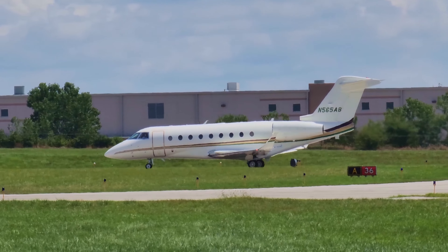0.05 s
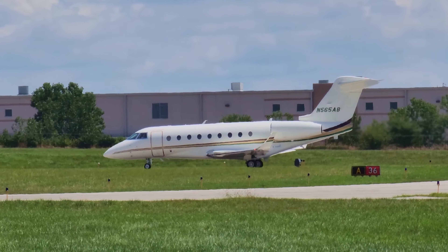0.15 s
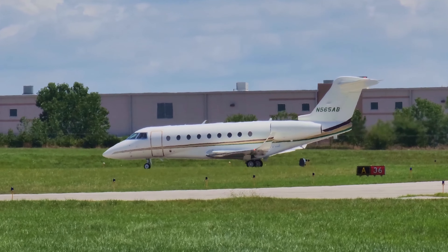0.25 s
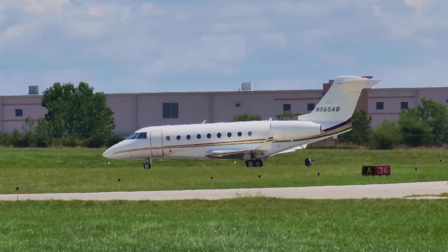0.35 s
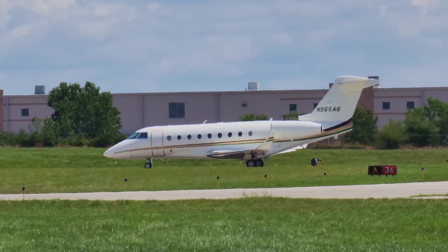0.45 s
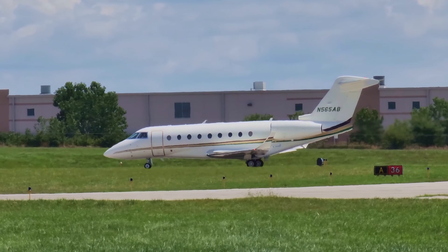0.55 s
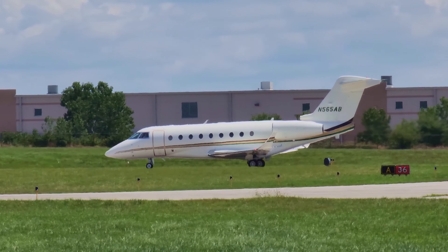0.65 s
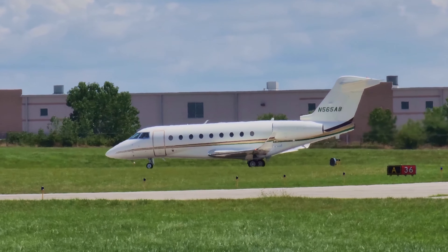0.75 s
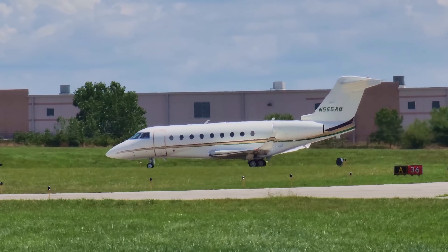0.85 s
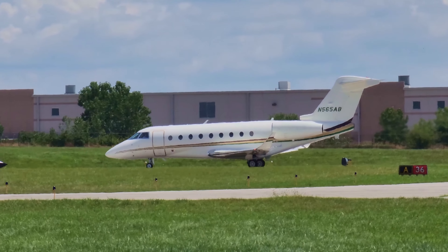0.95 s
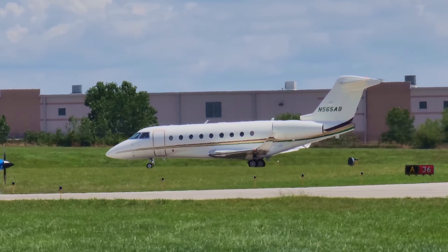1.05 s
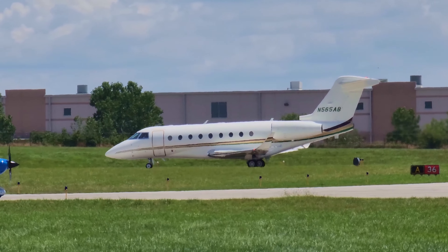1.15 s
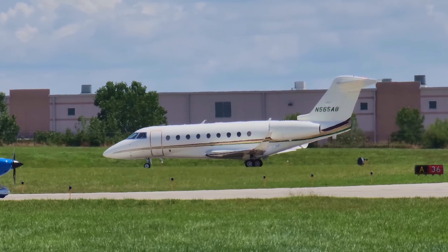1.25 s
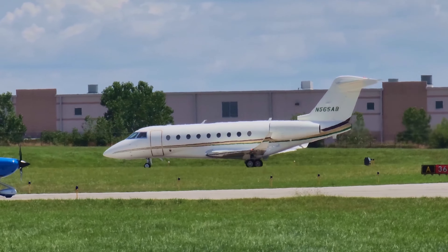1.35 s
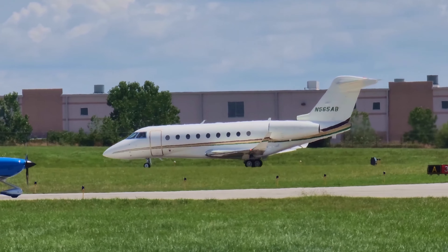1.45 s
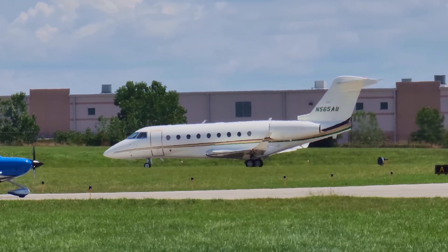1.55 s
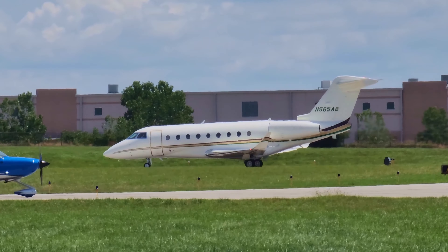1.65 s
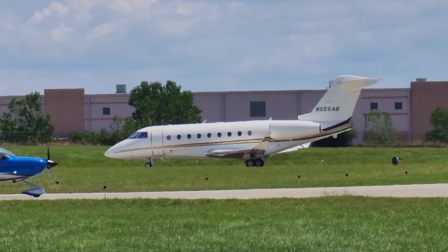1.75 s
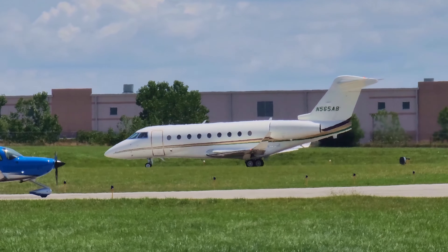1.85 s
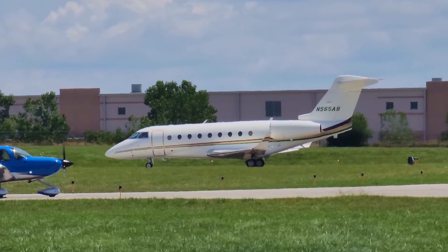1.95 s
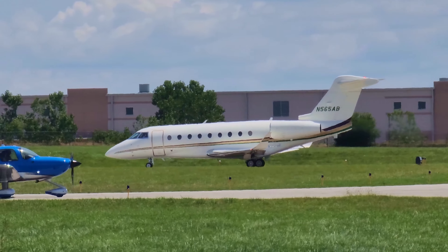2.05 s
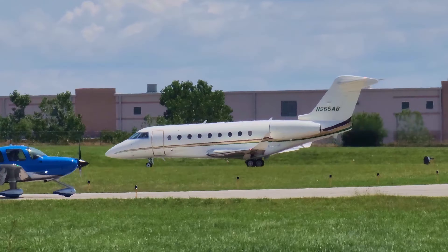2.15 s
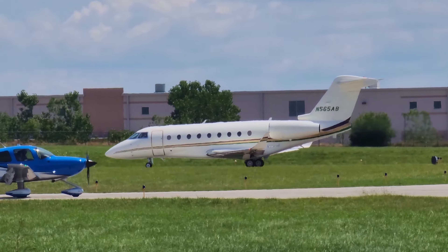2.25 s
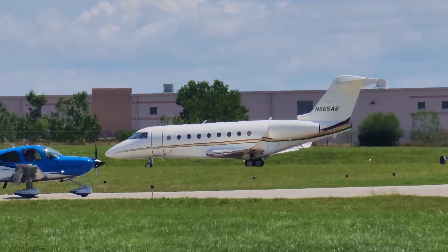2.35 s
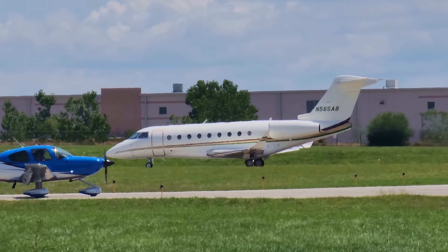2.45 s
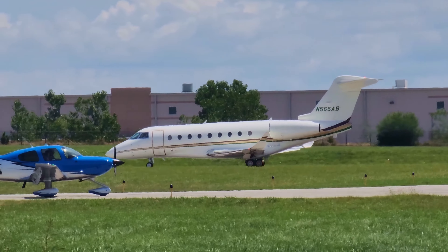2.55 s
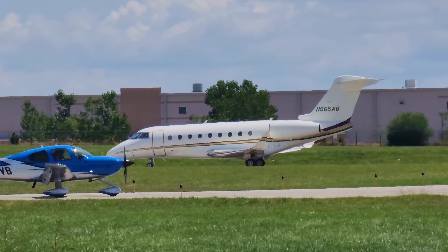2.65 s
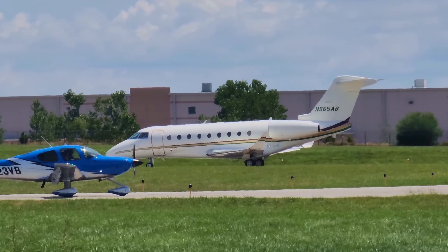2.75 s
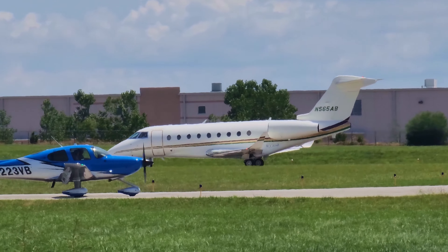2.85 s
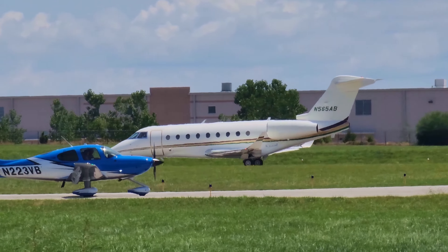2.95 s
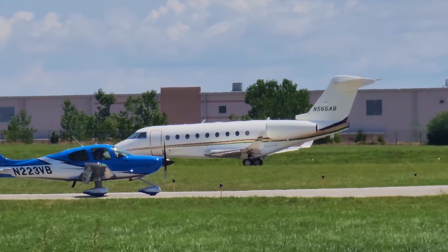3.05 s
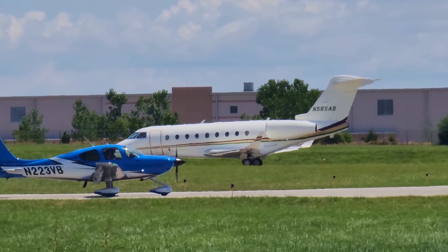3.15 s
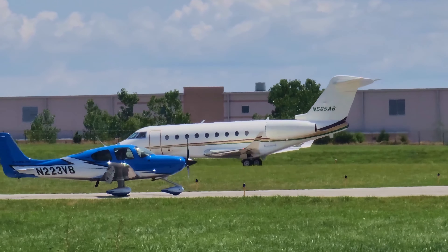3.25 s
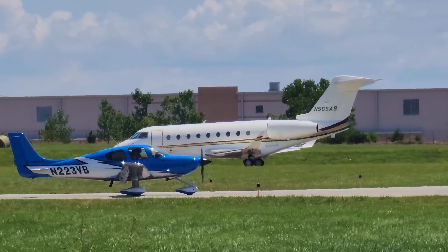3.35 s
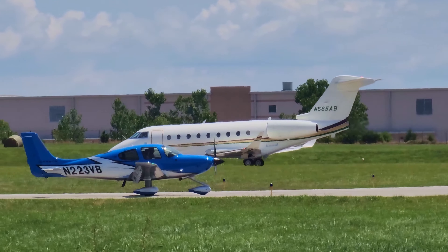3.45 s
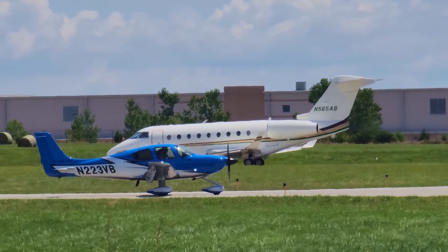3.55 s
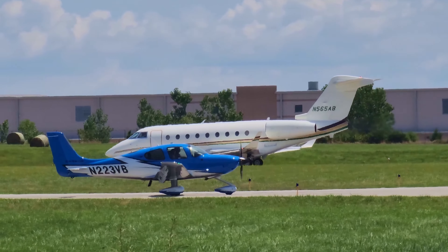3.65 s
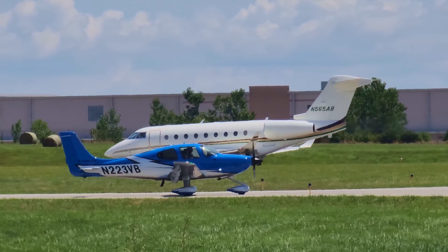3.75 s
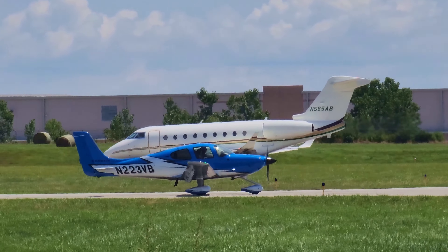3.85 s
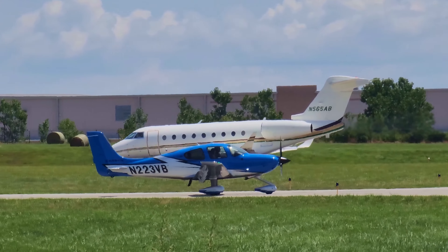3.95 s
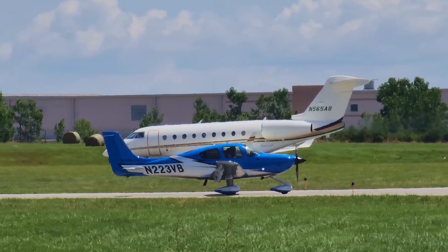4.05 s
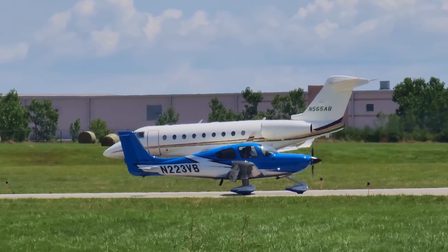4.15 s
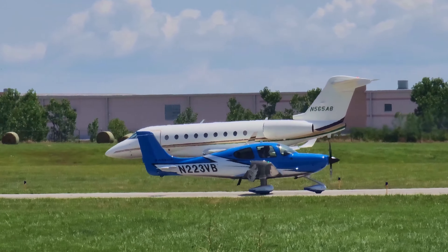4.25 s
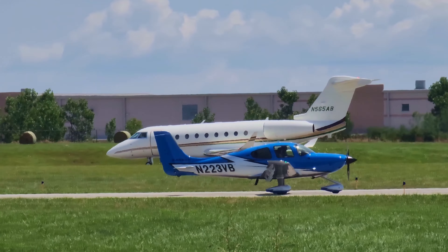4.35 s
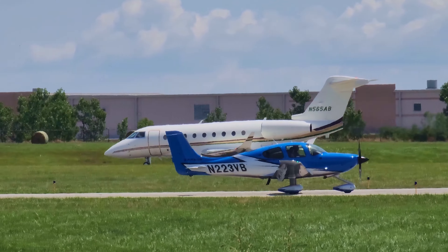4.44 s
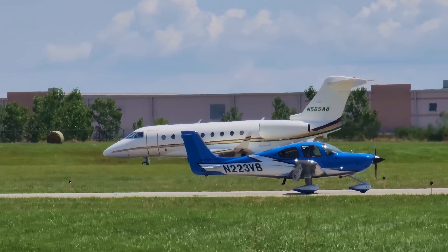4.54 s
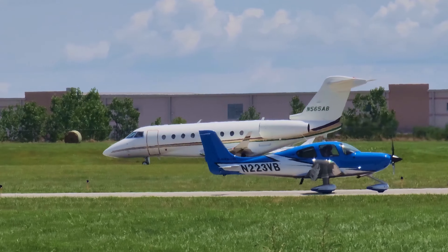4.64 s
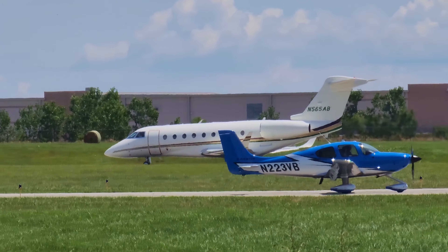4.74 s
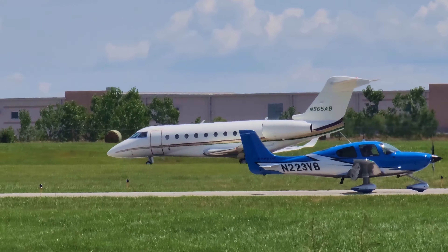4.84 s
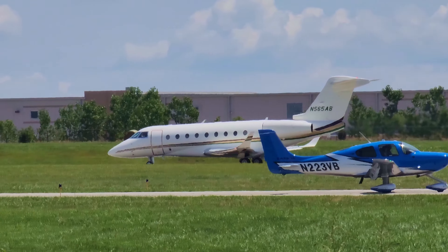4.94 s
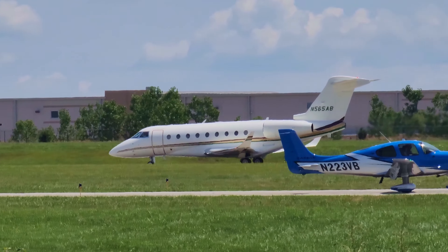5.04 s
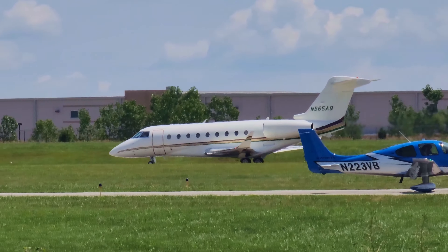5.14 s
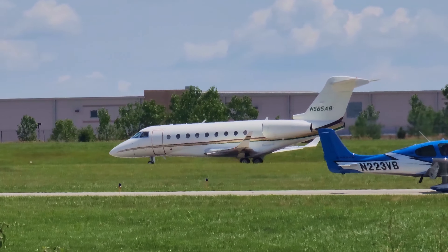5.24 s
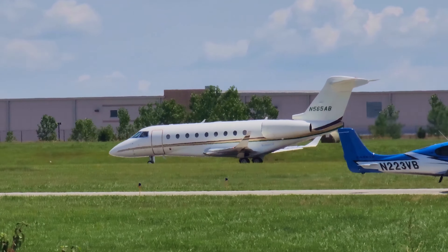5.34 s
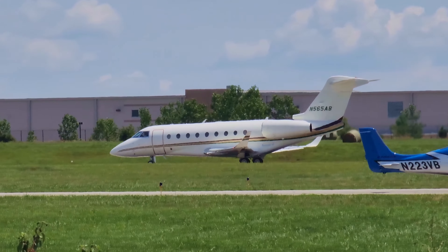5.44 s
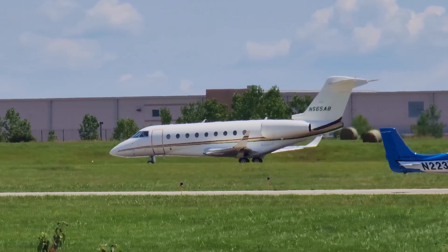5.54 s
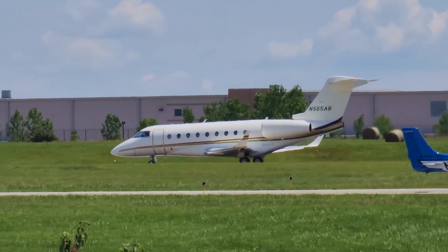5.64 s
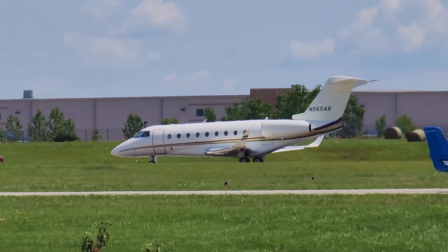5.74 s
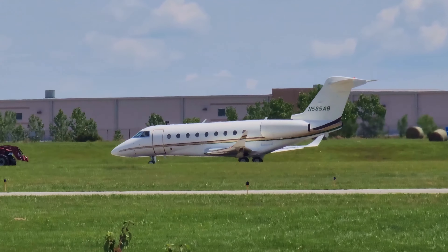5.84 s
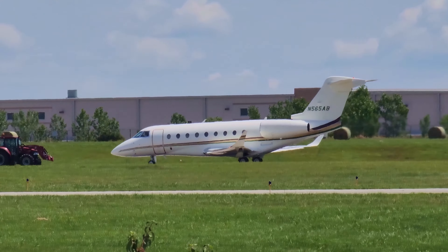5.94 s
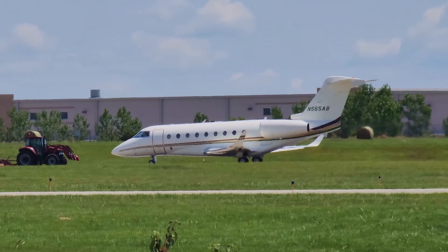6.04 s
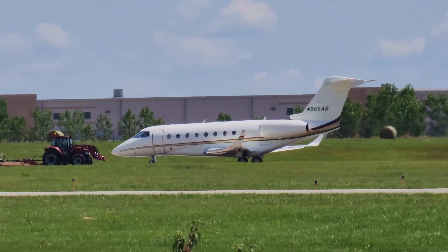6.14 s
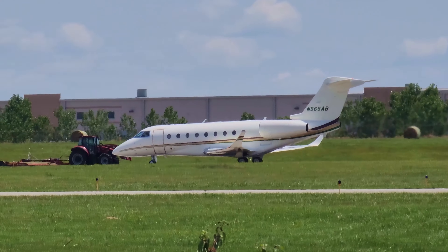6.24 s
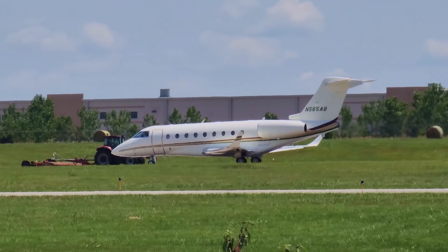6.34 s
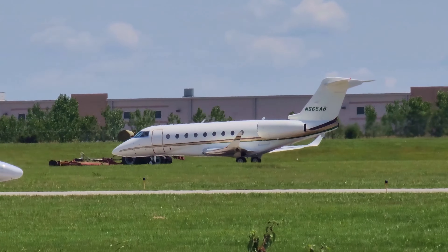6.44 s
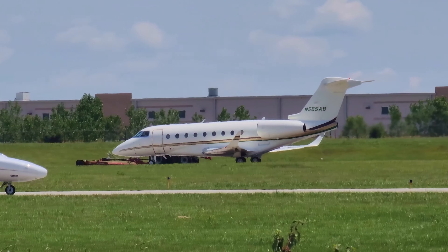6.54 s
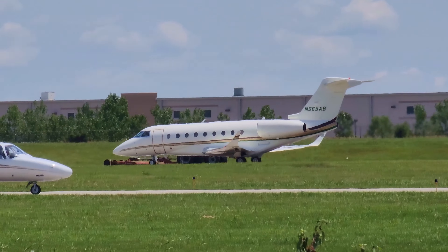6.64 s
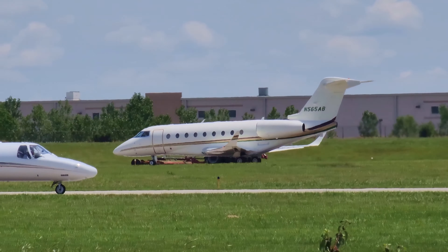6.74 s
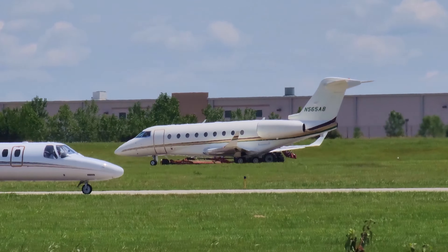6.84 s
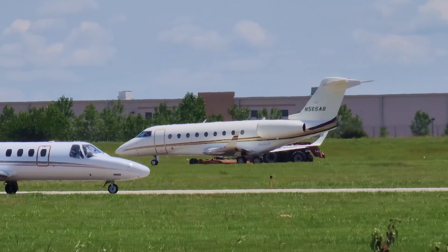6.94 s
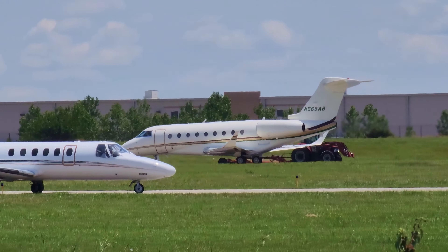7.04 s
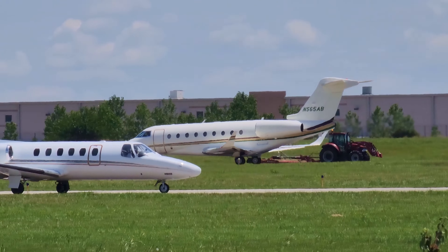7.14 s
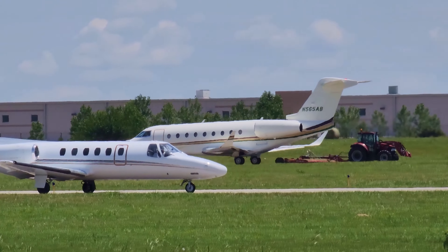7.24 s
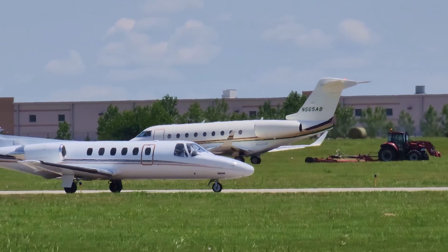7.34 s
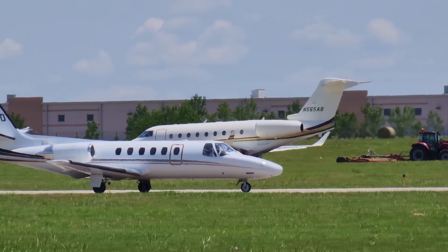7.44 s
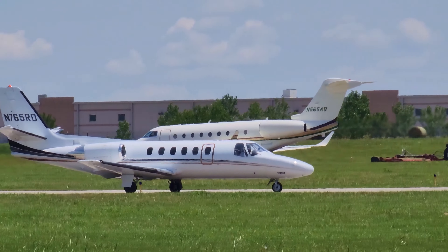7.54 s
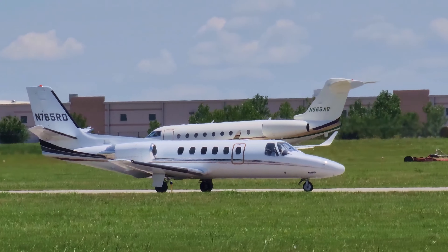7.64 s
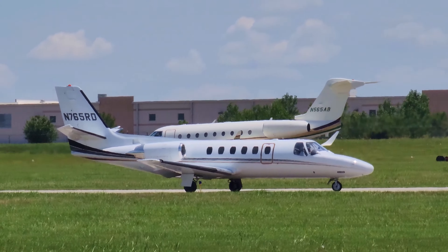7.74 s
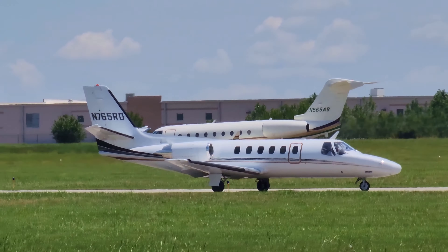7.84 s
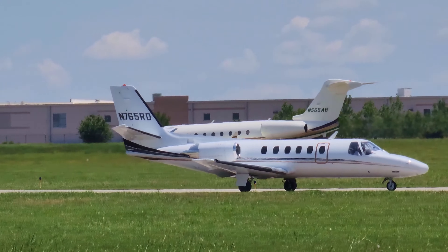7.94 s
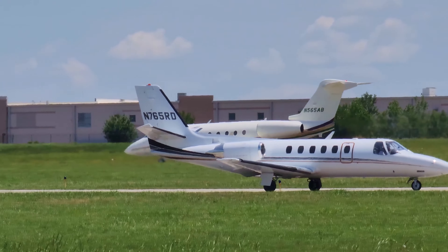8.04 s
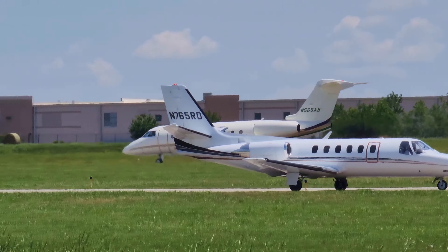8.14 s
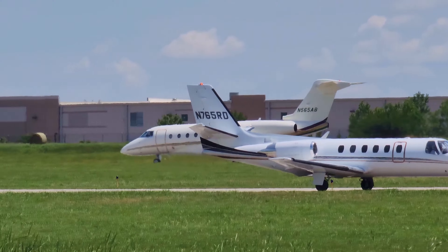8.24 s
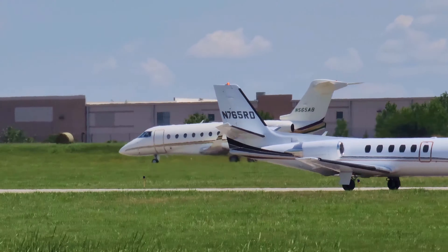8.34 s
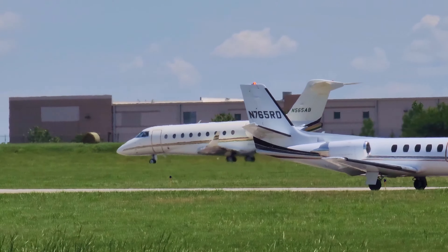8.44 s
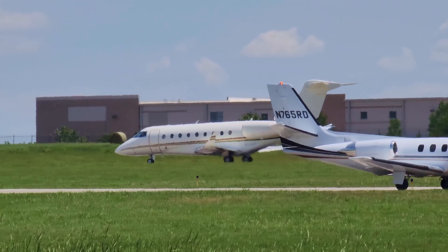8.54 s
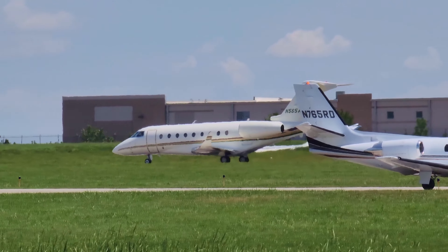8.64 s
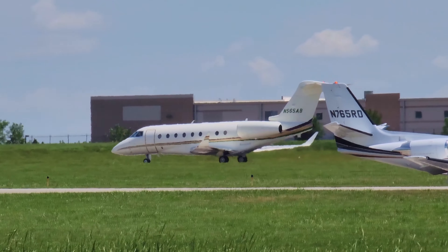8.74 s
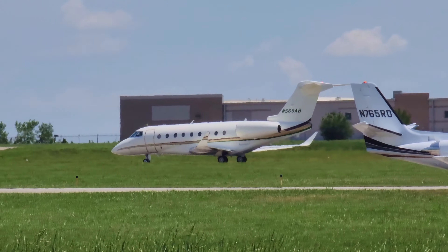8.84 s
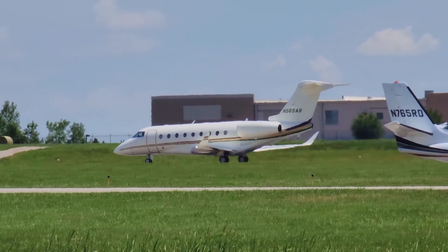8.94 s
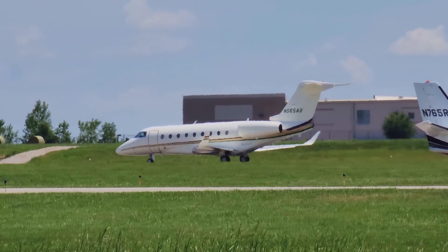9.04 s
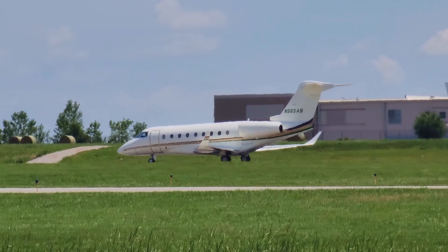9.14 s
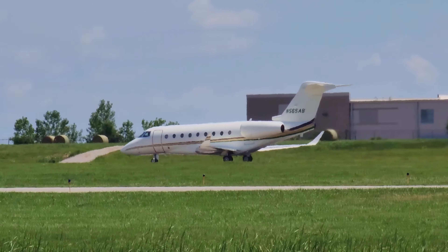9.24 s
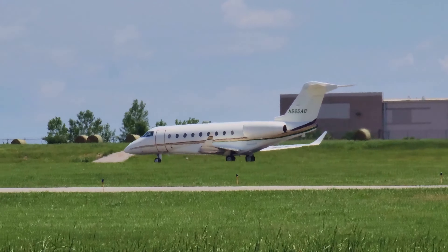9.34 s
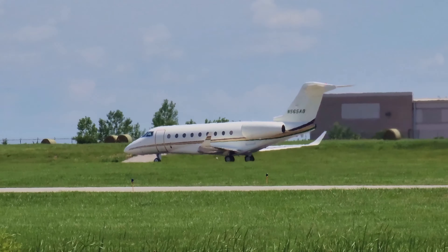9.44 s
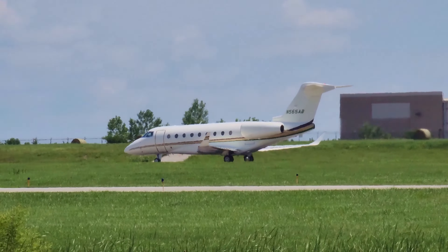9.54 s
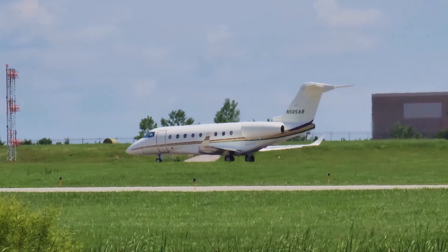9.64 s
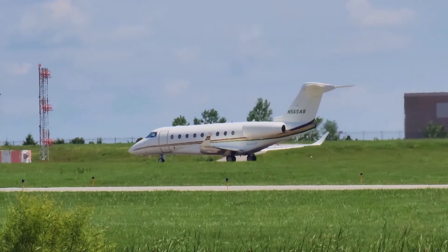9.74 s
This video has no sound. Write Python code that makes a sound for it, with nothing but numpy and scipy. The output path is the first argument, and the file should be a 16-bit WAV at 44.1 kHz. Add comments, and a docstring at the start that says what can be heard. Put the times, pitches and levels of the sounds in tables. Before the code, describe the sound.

A twin-engine business jet takes off across an open airfield, captured by a distant stereo outdoor microphone. From 0 to 2 s it idles up: uneven low rumble, airy hiss, and smeared compressor whines gliding from about 3 to nearly 5 kHz, swelling and fading. Another idling turbine adds steady thin tones and soft airflow slightly left; a fluttering whistle appears near 1.4 s, a higher falling one from 2.1 to 2.7 s. Power surges from 2.6 s; intake hiss crests around 3.3 s and a piercing fan whine near 3 kHz peaks at 3.5 s. By 4 s the deep exhaust roar buries almost everything, with a brief falling hum near 4.7 s. From 6 s the roar turns rougher and brighter, swaying with faint hollow coloration, still at full strength when it cuts off at 9.8 s. Low breeze puffs nudge the microphone, strongest around 9.6 s, and limiting flattens the loudest swells.

```python
"""Business jet taking off across an airfield

A jet across the field spools up from idle to takeoff power and starts its roll, heard on two ports.
Compressor and fan whines climb as smeared tones in a band of intake hiss, then drown in the exhaust:
filtered noise for a deep rumble and a roar, coloured by peaks and notches of the path over the ground.
An idling turbine's tones and airflow reach the left port first, thin whistles and hums come and go,
breeze stirs on the microphone, and the recorder's limiter holds the loudest swells."""
import sys
import numpy as np
from scipy import signal
from scipy.fft import rfft, irfft, next_fast_len
from scipy.io import wavfile
from scipy.ndimage import uniform_filter1d, minimum_filter1d, map_coordinates

SR = 44100
rng = np.random.default_rng(int(sys.argv[2]) if len(sys.argv) > 2 else 0)


def generate_wav(signal):
    """Clip the signal to [-1, 1] and save it as 16-bit WAV at the path in sys.argv[1]."""
    frames = np.transpose(np.atleast_2d(signal))
    scaled = np.clip(frames, -1, 1) * 32767
    pcm = np.round(scaled).astype(np.int16)
    wavfile.write(sys.argv[1], SR, pcm)


N = 431732

# engine power from idle to takeoff: (time [s], level relative to full power [dB])
POWER = [(0, -16), (.8, -16), (1.8, -12.5), (2.6, -10), (3.1, -4), (3.6, -1), (4.2, 0.25), (9.79, 0.62)]
# blade-passing pitch of the compressor's first stage: (time [s], pitch [Hz])
CORE = [(0, 2990), (.25, 3130), (.48, 3310), (1.03, 3741), (1.6, 4170), (1.82, 4480), (2.08, 4900),
        (2.6, 5930), (3.25, 7320), (4, 8300), (5.7, 8540), (7.2, 8510), (8.4, 8330), (9.79, 8290)]
# intake sound cresting during spool-up, reference for its noise and lines: (time [s], level [dB])
INTAKE = [(0, -53.5), (.6, -56), (1, -46), (1.7, -50), (2.1, -45.5), (2.5, -45), (2.95, -40), (3.3, -38.5),
          (3.6, -45.5), (4, -50.5), (4.7, -51.5), (9.79, -56)]
# centre of the intake hiss: base [Hz] plus slope [Hz per Hz of compressor pitch]
HUMP_BASE_HZ, HUMP_SLOPE = 2494, 0.64


def exhaust():
    """Large eddies rumble and small ones roar and hiss; all grow with engine power."""
    # noise spectra of the six bands: (frequency [Hz], density [dB per Hz])
    deep_spectrum = [(18, -38), (30, -15), (48, -6.5), (68, 0.5), (105, 0.5), (125, -5), (150, -8.5),
                     (220, -48.5), (500, -100)]
    rumble_spectrum = [(60, -38.5), (105, -7), (128, 1.5), (170, 0), (235, -11.5), (280, -22), (340, -44.5),
                       (460, -58), (1000, -110)]
    edge_spectrum = [(180, -27), (250, 4), (285, -1.5), (330, -4.5), (400, -11), (500, -23.5), (1000, -100)]
    low_spectrum = [(180, -42.5), (300, -10.5), (400, 2.5), (500, 1), (640, 4.5), (800, 7), (1000, -20.5),
                    (1400, -45.5), (3000, -100)]
    roar_spectrum = [(500, -51), (800, -11), (1000, -3), (1400, 4), (2200, -1.5), (2700, -2), (3200, -5.5),
                     (4000, -11), (5500, -30), (9000, -94)]
    hiss_spectrum = [(2000, -38.5), (3300, -16), (4000, 3.5), (4700, 7), (5500, 7.5), (6500, 2), (6900, -3),
                     (7500, -0.5), (8050, -5), (8500, -5), (11000, 1)]
    # band: (level at full power [dB], slope with power [dB per dB], slope with aim [dB per dB])
    bands = {"deep": (-8.5, 1, 0), "rumble": (-11.5, 1.1, 0), "edge": (-34, 0.95, 0),
             "low": (-38, 1.52, 0.84), "roar": (-27.5, 1.43, 0.91), "hiss": (-37.5, 0.73, 0.53)}
    # the rolling jet turns its exhaust toward the listener: (time [s], gain [dB])
    aim_points = [(4.6, 0.5), (5, -1.7), (5.6, 0), (6, 3.5), (6.5, 2.5), (7.3, 3.5), (8, 5), (8.9, 4.5),
                  (9.15, 5), (9.4, 6), (9.79, 4.5)]
    # brightness of the rumble: (time [s], gain of the rumble [dB], gain of its top edge [dB])
    brightness = [(0, -2, 1.5), (.3, 2, -1.5), (.4, 6, 9.5), (.52, 2, 0), (1.5, 0, 1.5), (3.3, 0.5, -2.5),
                  (4.5, 1, 2.5), (5.4, -5.5, -7), (6.1, -6, 0), (6.7, -2, 5), (7.7, 0.5, 5.5),
                  (8.4, 1.5, 3), (9.5, -2.5, -3)]
    # slow sway: (time [s], gain of the low roar [dB], gain of the hiss [dB])
    sway = [(2, -1.5, -1), (2.8, 2.5, 0.5), (3.9, -2, -2), (4.5, -1.5, 1.3), (5.1, 0.5, -2.7),
            (5.55, 2.5, -0.5), (5.95, -3.5, -0.5), (6.25, 1, 1.5), (6.55, -3, -0.5), (7.1, 0.5, 2),
            (7.45, -0.5, -0.5), (7.7, -1.5, -.5), (8.05, -2.5, -0.5), (8.4, 3, 0.5), (8.85, -1, 0.5),
            (9.35, 2.5, 2.5), (9.6, 0.5, -4.5), (9.79, 5.5, 0.5)]
    # the two deepest bands dip briefly: (time [s], length [s], depth [dB])
    lulls = [(0, 0.15, 8.5), (0.615, 0.29, 12), (1.277, .1, 4), (2.614, 0.36, 3)]
    # the two deepest bands wander between the ears at first: (time [s], left minus right [dB])
    wander_points = [(0, -5), (.75, -1.5), (1.25, -4.5), (1.7, 1.5), (2.25, 0.5), (2.7, -6), (3.1, 0)]

    power, = curves(POWER)
    aim, = curves(aim_points)
    rumble_db, edge_db = curves(brightness)
    low_db, hiss_db = curves(sway)
    level = {band: db + by_power * power + by_aim * aim
             for band, (db, by_power, by_aim) in bands.items()}

    deep = amp(level["deep"] + 0.99 * wobble(12)) * turbulence(deep_spectrum, patchy_db=0.33)
    rumble_level = level["rumble"] + rumble_db + 0.6 * wobble(9)
    rumble = amp(rumble_level) * turbulence(rumble_spectrum, patchy_db=0.82)
    edge = amp(level["edge"] + edge_db + 1.3 * wobble(8)) * turbulence(edge_spectrum, patchy_db=2.0)
    low = amp(level["low"] + low_db + 1.4 * wobble(10)) * turbulence(low_spectrum, patchy_db=1.5)
    flutter = wobble(22)  # roar and hiss flutter together
    roar = amp(level["roar"] + 0.25 * flutter) * turbulence(roar_spectrum, patchy_db=1.1)
    hiss = amp(level["hiss"] + hiss_db + 0.26 * flutter) * turbulence(hiss_spectrum, patchy_db=1.5)

    lull = amp(-sum(db * swell(s, length) for s, length, db in lulls))
    wander = amp(np.outer([0.5, -0.5], curves(wander_points)[0]))
    upper = placed(over_ground(low + roar + hiss), lead_ms=-0.026, pan_db=-1.0)
    return lull * wander * (deep + rumble) + edge + upper


def over_ground(pair):
    """Sliding path peaks and notches, a wall's echo combing the sound, and a quick grain from moving air."""
    # how the peaks and notches move: (time [s], shift [Hz], depth [factor])
    path_drift = [(0, -2, 1.1), (3.7, -8, 0.82), (4.6, -2.5, 1), (6.2, 11, 0.85), (7.4, 14, 0.93),
                  (8.4, -7.5, 0.79), (8.9, 5, 0.85), (9.35, -10, 0.88), (9.79, -13.5, 0.8)]
    # the path changes from standstill to rolling between these times: (start [s], end [s])
    rolling_s = (5.0, 5.9)
    wall_db, wall_delay_s, wall_drift_s_per_s = -15, 0.006, 0.0004  # the echo falls steadily behind
    grain_db = 2.2

    hz, t, z = signal.stft(pair, SR, nperseg=2048)
    s, shift_hz, depth = np.transpose(path_drift)
    rolling = np.interp(t, rolling_s, [0, 1])
    shifted_hz = hz[:, None] - np.interp(t, s, shift_hz)
    path = amp(np.interp(t, s, depth) * path_db(shifted_hz, rolling))
    echo_delay_s = wall_delay_s + wall_drift_s_per_s * t
    comb = 1 + amp(wall_db) * np.exp(-2j * np.pi * np.outer(hz, echo_delay_s))
    field = uniform_filter1d(rng.standard_normal(path.shape), size=2, axis=0)
    field = uniform_filter1d(field, size=3, axis=1)
    grain = unit(amp(grain_db * unit(field)))
    return signal.istft(z * path * comb * grain, nperseg=2048)[1][:, :N]


def path_db(hz, rolling):
    """Reflections lift some bands and cancel others, differently once the jet is rolling."""
    # peaks and notches: (centre [Hz], width [Hz], gain near standstill [dB], gain when rolling [dB])
    path_bands = [(610, 32, 5, 6), (974, 71, 9, 8), (1150, 36, -6, -11.5), (1345, 34, 3.5, 3),
                  (1561, 48, -8.5, -10), (1760, 47, 0, 0), (1970, 56, -4.5, -1), (2224, 75, 3, 3.5),
                  (2450, 61, -4, -1), (2680, 70, -0.5, 1.5), (2856, 65, -4, -4), (3080, 70, 5, 4),
                  (4210, 63, -0.5, 3.5), (5480, 90, 2.5, 1), (6500, 100, 4.5, 4)]
    total_db = 0
    for centre, width, early, late in path_bands:
        bell = np.exp(-0.5 * ((hz - centre) / width) ** 2)
        total_db = total_db + (early + (late - early) * rolling) * bell
    return total_db


def narrow_swells(width_hz=40):
    """Narrow bands of noise swell and fade at fixed pitches, straight ahead."""
    # (time of peak [s], time above half its height, halved [s], pitch [Hz], level [dB])
    swells = [(.72, 0.15, 1373, -46.5), (1.12, 0.33, 1110, -60), (1.62, 0.32, 1402, -45),
              (2.2, .38, 974, -54), (4.35, 0.17, 1025, -40.5), (6.17, 0.14, 2190, -30),
              (7.447, 0.4, 1006, -35.5), (7.953, 0.49, 1760, -34), (8.3, 0.43, 1364, -31.5),
              (8.87, 0.06, 2234, -28), (8.885, 0.1, 1332, -25.5), (9.044, 0.14, 1230, -29),
              (9.423, 0.18, 987, -30), (9.542, 0.34, 2220, -32)]
    t = np.arange(N) / SR
    bell = lambda hz: np.exp(-0.25 * (hz / width_hz) ** 2)
    drift = unit(filtered(rng.standard_normal((2, N)), bell))
    out = np.zeros(N)
    for s, length, hz, db in swells:
        phase = 2 * np.pi * hz * t
        band = drift[0] * np.cos(phase) + drift[1] * np.sin(phase)
        out += amp(db) * swell(s, 2 * length) * band
    return out


def intake_hiss(width_hz=850, skirt_hz=2200, skirt_db=-13):
    """Turbulence chopped by the compressor blades: a hump of noise that climbs with the shaft."""
    def hump(hz):
        core = np.exp(-0.25 * (hz / width_hz) ** 2)
        return core + amp(skirt_db) * np.exp(-0.25 * (hz / skirt_hz) ** 2)

    noise = filtered(rng.standard_normal((2, 2, N)), hump)
    centre_hz = HUMP_BASE_HZ + HUMP_SLOPE * curves(CORE)[0]
    phase = 2 * np.pi * np.cumsum(centre_hz) / SR
    hiss = unit(noise[0] * np.cos(phase) + noise[1] * np.sin(phase))
    pan_db = np.array([[-1.5], [1.5]])  # stronger at the right port
    return amp(curves(INTAKE)[0] - 1.5 + 0.82 * wobble(10) + pan_db) * hiss


def shaft_lines():
    """Uneven blades sound multiples of the shaft speed, each line fading on its own under the hiss."""
    first_stage_blades, first_order, last_order = 28, 22, 41
    lines_db, width_hz = -7, 750  # level against the intake reference; spread about the hiss centre
    fade_db, fade_rate, smear_rad = 6, 28, 1.8  # depth, knots a second, phase jitter

    core_hz, = curves(CORE)
    shaft_hz = core_hz / first_stage_blades
    phase = 2 * np.pi * np.cumsum(shaft_hz) / SR
    centre_hz = HUMP_BASE_HZ + HUMP_SLOPE * core_hz
    out = np.zeros((2, N))
    for order in range(first_order, last_order + 1):
        hump = np.exp(-0.25 * ((order * shaft_hz - centre_hz) / width_hz) ** 2)
        fading = unit(amp(fade_db * wobble(fade_rate)))
        line = hump * fading * np.sin(order * phase + smear_rad * wobble(60))
        angle = rng.uniform(0, 2 * np.pi)  # random balance and polarity at the ports
        out += np.outer([np.cos(angle), np.sin(angle)], line)
    return amp(curves(INTAKE)[0] + lines_db) * unit(out)


def compressor():
    """Stages whine at multiples of the climbing shaft speed and swell as their beams sweep past."""
    # stage: blade count relative to the first stage [ratio]
    stages = {"first": 1, "second": 1.107, "third": 1.32}
    smear_hz = 4600  # the air jitters a whine of this pitch by about one radian, higher ones more
    hz, = curves(CORE)
    # the whine between swells fades out over the second before 2.8 s
    faint = amp(-65) * np.clip(2.8 - np.arange(N) / SR, 0, 1)
    return sum(tone(hz * ratio, faint + beam_gain(stage), smear=hz * ratio / smear_hz, fade_db=4.5)
               for stage, ratio in stages.items())


def fan():
    """Two fans whine slightly out of step, with a smeared octave above."""
    # blade-passing pitch of the fan: (time [s], pitch [Hz])
    fan_pitch = [(0, 1250), (1.8, 2034), (2.3, 2077), (2.62, 2320), (2.95, 2613), (3.42, 3025),
                 (3.85, 3216), (4.3, 3291), (9.79, 3330)]
    hz, = curves(fan_pitch)
    gain = amp(-66.5) + beam_gain("fan")
    strong = tone(hz, gain, smear=0.45, fade_db=1.2)
    weak = tone(hz * 1.008, gain * amp(-12), smear=1.2)
    octave = tone(2 * hz, gain * amp(-27.5) + beam_gain("fan octave"), smear=1.2)
    return strong + weak + octave


def beam_gain(blades):
    """A whine swells as its beam sweeps past: the summed swells of one row of blades."""
    # (time of peak [s], time above half its height [s], row of blades, level [dB])
    beams = [(.05, 0.22, "first", -46), (.32, .25, "first", -53), (.73, 0.22, "first", -45.5),
             (.94, 0.11, "first", -44.5), (1.03, .05, "first", -51), (1.62, .12, "first", -54),
             (1.825, 0.094, "first", -43.5), (1.97, .08, "first", -52), (2.08, .08, "first", -48.5),
             (2.68, .2, "first", -54), (2.95, .3, "first", -53), (6.147, .7, "first", -60.5),
             (7, 0.46, "first", -62), (9.2, .9, "first", -62), (.83, .12, "second", -59),
             (1.03, .06, "second", -53), (1.4, .35, "second", -60), (1.9, .25, "second", -58),
             (2.13, .1, "second", -50), (2.28, .09, "second", -51), (2.39, .09, "second", -49),
             (2.6, .1, "second", -53), (3.25, 0.22, "second", -58), (1.05, .5, "third", -59.5),
             (1.62, .3, "third", -61), (2.2, .3, "third", -57), (1.84, 0.16, "fan", -45),
             (2.247, 0.56, "fan", -47.5), (2.495, .083, "fan", -45), (2.82, .14, "fan", -40),
             (2.96, .1, "fan", -46), (3.42, .04, "fan", -35.5), (3.485, .07, "fan", -29.5),
             (3.575, .1, "fan", -30), (3.72, .13, "fan", -35), (3.86, .09, "fan", -38),
             (4.294, .2, "fan", -39), (3.47, .25, "fan octave", -52), (3.92, 0.29, "fan octave", -50),
             (4.5, .6, "fan octave", -56)]
    return sum(amp(db) * swell(s, length) for s, length, which, db in beams if which == blades)


def idling_turbine():
    """Narrow lines and a soft rush of airflow, held at a nearly steady level as the roar grows."""
    # lines: (pitch [Hz], level [dB], fully faded in by [s])
    idle_tones = [(2020, -54.5, 0), (3372, -50.5, 0), (4277, -54.5, .5), (6735, -66, .4), (10745, -60, 0)]
    # airflow noise: (frequency [Hz], density [dB per Hz])
    idle_air = [(100, 2), (280, 16), (380, -5.5), (520, -1), (800, -2.5), (1100, -3), (1370, 3.5),
                (1620, 1), (2200, 7.5), (2420, 1), (2700, -2), (3400, -.5), (4000, -4.5), (5500, -7),
                (7000, -8), (8500, -13.5), (10000, -21)]
    rise_s = 0.2
    t = np.arange(N) / SR
    lines = np.zeros((2, N))
    for hz, db, start in idle_tones:
        fade_in = np.clip(1 + (t - start) / rise_s, 0, 1)
        lines += tone(hz, amp(db) * fade_in, smear=0.25, fade_db=2.5)
    air = unit(filtered(rng.standard_normal((3, N)), lambda hz: amp(along(idle_air, hz))))
    rush = air[:2] + air[2]  # part separate at each port, part shared
    return placed(lines + amp(-43.5 + 0.93 * wobble(5.1)) * rush, lead_ms=0.12, pan_db=-1.0)


def whistles():
    """Nearly pure tones slide and flutter: whistles reach the left port first, hums come from ahead."""
    # thin whistles and hums: (time [s], pitch [Hz], level [dB])
    low_whistle = [(1.05, 1780, -100), (1.1, 1780, -48), (1.185, 1780, -41), (1.235, 1785, -58),
                   (1.32, 1795, -45), (1.365, 1798, -33.5), (1.41, 1800, -39.5), (1.46, 1802, -38),
                   (1.53, 1806, -41.5), (1.565, 1806, -58), (1.607, 1804, -39.5), (1.66, 1795, -54),
                   (1.7, 1795, -100)]
    high_whistle = [(2.05, 3330, -100), (2.085, 3270, -45), (2.14, 3185, -48), (2.22, 3125, -42.5),
                    (2.33, 3095, -48), (2.52, 3100, -43.5), (2.65, 3073, -45), (2.71, 3070, -100)]
    falling_hum = [(4.5, 1015, -100), (4.6, 1008, -44), (4.68, 1000, -33.5), (4.79, 968, -34.5),
                   (4.88, 960, -44), (5, 955, -100)]
    steady_hum = [(2, 651, -80), (2.6, 651, -54), (3.3, 651, -47), (9.79, 651, -46)]
    flutter_hz, jitter_rad = 33.2, 1.6  # rate of the flutter and its unevenness

    def sing(curve, flutter, smear):
        """One gliding tone with an uneven tremble."""
        hz, db = curves(curve)
        flutter_phase = 2 * np.pi * flutter_hz * np.arange(N) / SR + jitter_rad * wobble(19)
        tremble = 1 + flutter * np.sin(flutter_phase)
        phase = 2 * np.pi * np.cumsum(hz) / SR + smear * wobble(45)
        return np.sqrt(2) * amp(db) * tremble * np.sin(phase)

    left = sing(low_whistle, flutter=0.15, smear=0.2) + sing(high_whistle, flutter=0.7, smear=0.4)
    ahead = sing(falling_hum, flutter=0.2, smear=0.35) + sing(steady_hum, flutter=0.2, smear=0.8)
    return placed(left, lead_ms=0.08, pan_db=-3) + ahead


def breeze():
    """Soft, lumpy air pressure on the microphone, over a faint rumble separate at each port."""
    # spectrum of the lumpy pressure: (frequency [Hz], density [dB per Hz])
    gust_spectrum = [(10, -16), (25, 1), (45, -0.5), (70, -13.5), (150, -46.5), (300, -100)]
    # puffs: (time of peak [s], time above half its height [s], level before a 1.5 dB trim [dB])
    puffs = [(0.1, 0.2, -36), (0.43, 0.15, -27.5), (2.103, 0.79, -30), (4.997, 0.43, -39.5),
             (6.149, 0.69, -31), (9.607, 0.52, -16.5)]
    port_spectrum = [(20, -10.5), (60, -3.5), (130, 3.5), (300, -34.5), (700, -65.0)]  # (Hz, dB per Hz)
    ports = unit(filtered(rng.standard_normal((2, N)), lambda hz: amp(along(port_spectrum, hz))))
    strength = amp(-36 + curves(POWER)[0])  # the air stirs more as the power rises
    strength = strength + sum(amp(db) * swell(s, length) for s, length, db in puffs)
    return strength * amp(-1.5) * turbulence(gust_spectrum, patchy_db=1.0) + amp(-34.5) * ports


def turbulence(spectrum, patchy_db):
    """Stereo noise whose middle has rms 1; moving air focuses and scatters it in patches."""
    # left-right likeness: (frequency [Hz], correlation [0 to 1])
    alike = [(30, 0.82), (70, 0.96), (140, 1), (350, 0.97), (700, 0.81), (1400, 0.85), (2600, 0.81),
             (4500, 0.48), (8000, 0.049)]
    z = signal.stft(rng.standard_normal((2, N)), nperseg=512)[2]
    field = uniform_filter1d(rng.standard_normal(z.shape[1:]), size=4, axis=0)
    field = uniform_filter1d(field, size=30, axis=1)
    pair = signal.istft(z * amp(patchy_db * unit(field)), nperseg=512)[1][:, :N]

    def mid_side(hz):
        turn = np.arccos(np.clip(along(alike, hz), -1, 1)) / 2
        return amp(along(spectrum, hz)) * [np.cos(turn), np.sin(turn)]

    mid, side = filtered(pair, mid_side)
    return np.array([mid + side, mid - side]) / np.std(mid)


def tone(hz, gain, smear, fade_db=1.5):
    """A far tone: the air jitters its phase and makes it fade, its phase drifting between the ears."""
    phase = 2 * np.pi * np.cumsum(hz * np.ones(N)) / SR + smear * wobble(70)
    fading = unit(amp(fade_db * wobble(30)))
    return np.sqrt(2) * gain * fading * np.sin(phase + np.outer([1, -1], 0.62 * wobble(12)))


def placed(pair, lead_ms, pan_db):
    """Position by arrival and level: the left port leads by lead_ms and is pan_db above the right."""
    sides = np.array([[0.5], [-0.5]])
    advance = lambda hz: np.exp(2j * np.pi * hz * sides * lead_ms / 10 ** 3)
    return amp(sides * pan_db) * filtered(pair, advance)


def swell(s, length):
    """A smooth rise to 1 at s and fall back, above one half for length seconds."""
    u = (np.arange(N) / SR - s) / length
    inside, out = np.abs(u) < 1, np.zeros(N)
    out[inside] = np.cos(np.pi * u[inside] / 2) ** 2
    return out


def wobble(rate):
    """A smooth random curve, rate knots a second."""
    knots = rng.standard_normal(int(N * rate / SR) + 4)
    coarse = np.arange(0, N, 32)
    return np.interp(np.arange(N), coarse, map_coordinates(knots, [coarse * rate / SR]))


def curves(rows):
    """One value per sample for each column after the time."""
    s, *cols = np.transpose(rows)
    return [np.interp(np.arange(N) / SR, s, c) for c in cols]


def along(points, hz):
    """Interpolate (Hz, value) points on a log axis."""
    f, v = np.transpose(points)
    return np.interp(np.log(hz + 1), np.log(f + 1), v)


def filtered(x, response):
    """Shape the spectrum of x by a response of frequency."""
    m = next_fast_len(N + SR // 4, real=True)
    return irfft(rfft(x, m) * response(np.fft.rfftfreq(m, 1 / SR)), m)[..., :N]


def amp(db):
    """Decibels to gain."""
    return 10 ** (np.asarray(db) / 20)


def unit(x):
    """Scale to rms 1."""
    return x / np.sqrt(np.mean(x ** 2) + 1e-20)


def scene():
    """The jet and the field around it."""
    jet = exhaust() + intake_hiss() + shaft_lines() + compressor() + fan()
    return jet + narrow_swells() + idling_turbine() + whistles() + breeze()


def record(dry):
    """Bass phase differs by port, treble falls steeply above 8.5 kHz, a fast limiter holds tall swells."""
    # treble roll-off: (frequency [Hz], gain [dB])
    treble = [(8550, 0), (8850, -6), (9150, -12), (10600, -21), (11400, -37), (15500, -35)]
    lead_hz, top_hz = 12, 15700  # the right port's phase leads by 45 degrees here; band limit
    skew = lambda hz: np.exp(1j * np.outer([-0.5, 0.5], np.arctan2(lead_hz, hz)))
    rolled_off = filtered(dry, lambda hz: amp(along(treble, hz)) * skew(hz))
    needed = np.minimum(1, 1 / (np.abs(rolled_off).max(axis=0) + 1e-9))
    gain = uniform_filter1d(minimum_filter1d(needed, size=600), size=500)
    return filtered(rolled_off * gain, lambda hz: hz < top_hz)


dry = scene()
out = record(dry)
generate_wav(out)
```